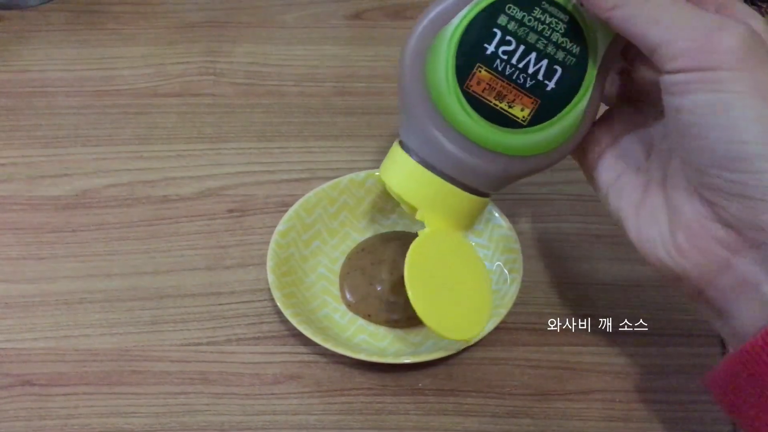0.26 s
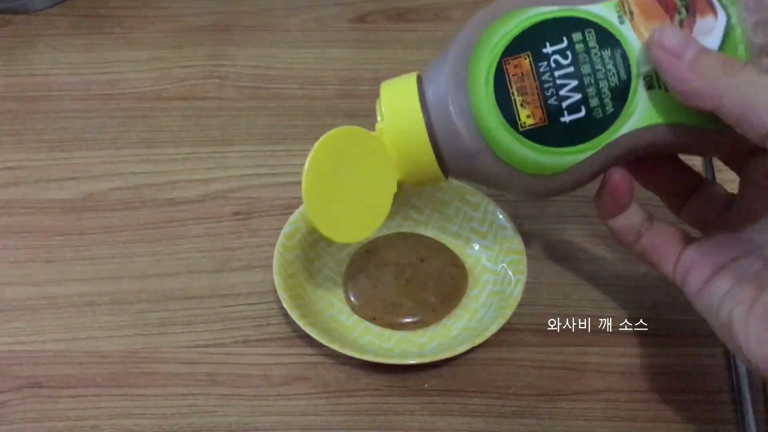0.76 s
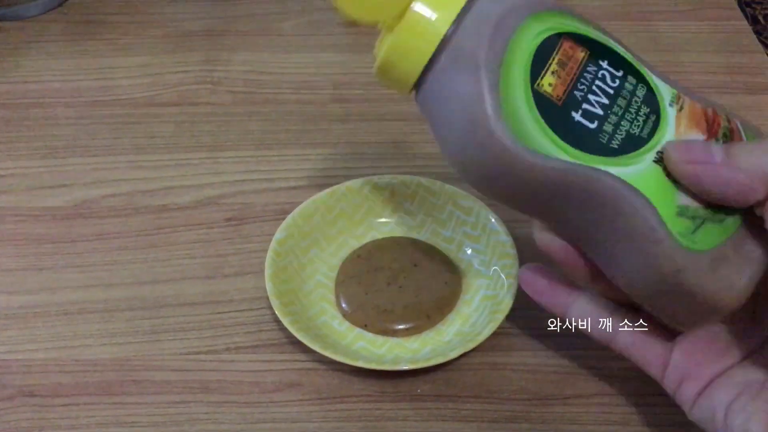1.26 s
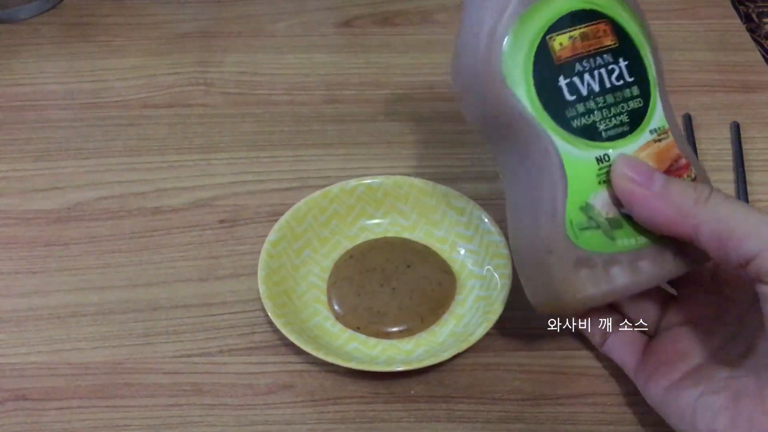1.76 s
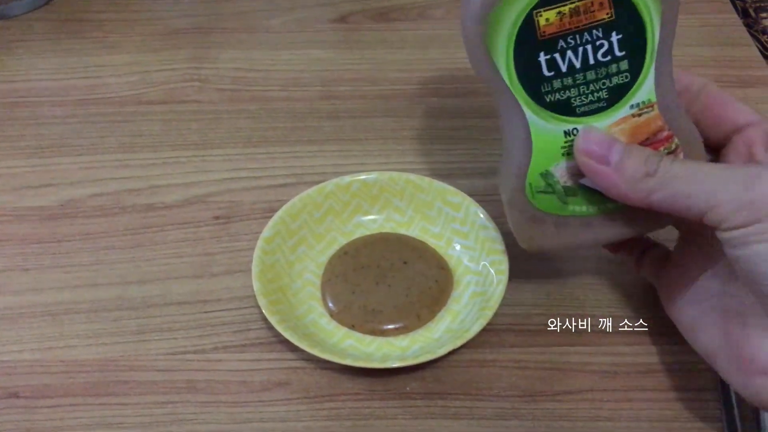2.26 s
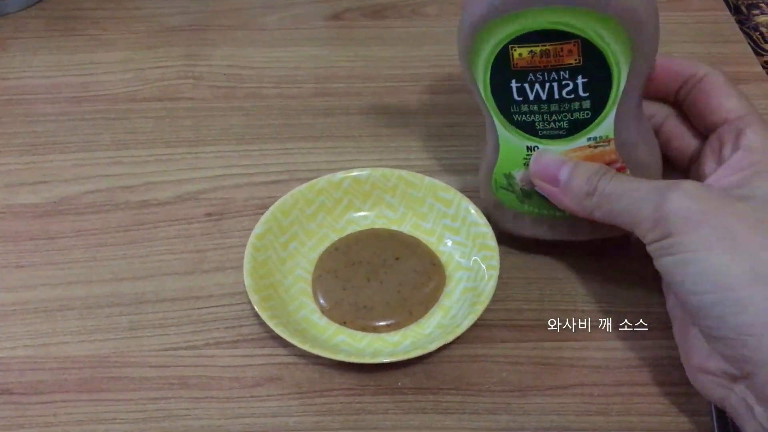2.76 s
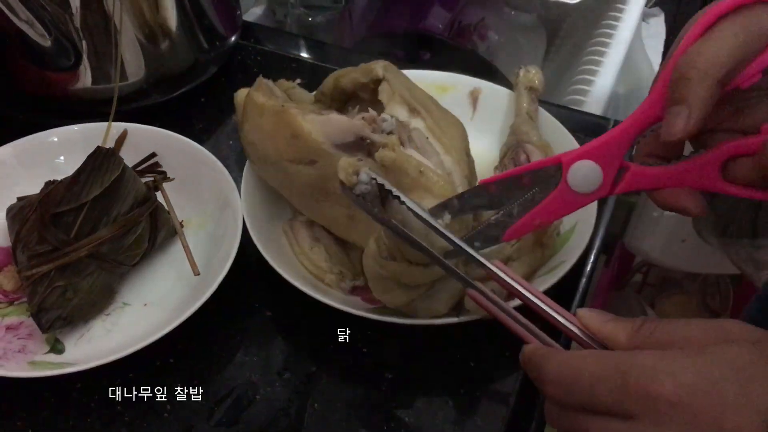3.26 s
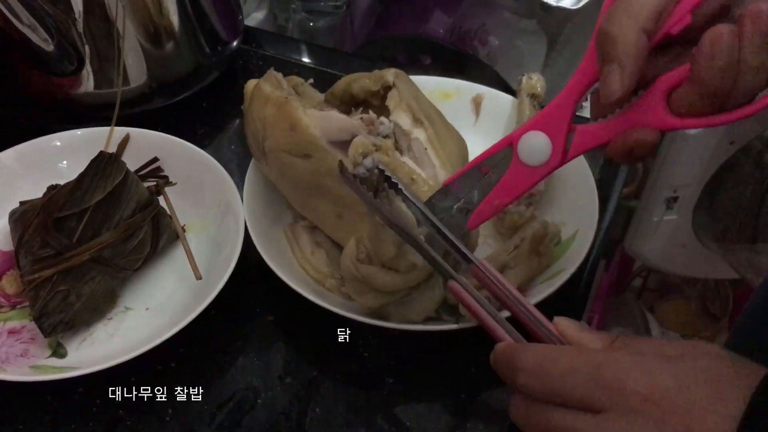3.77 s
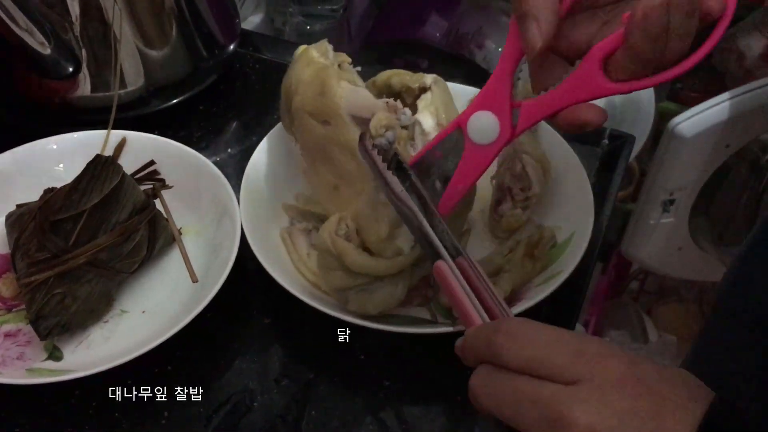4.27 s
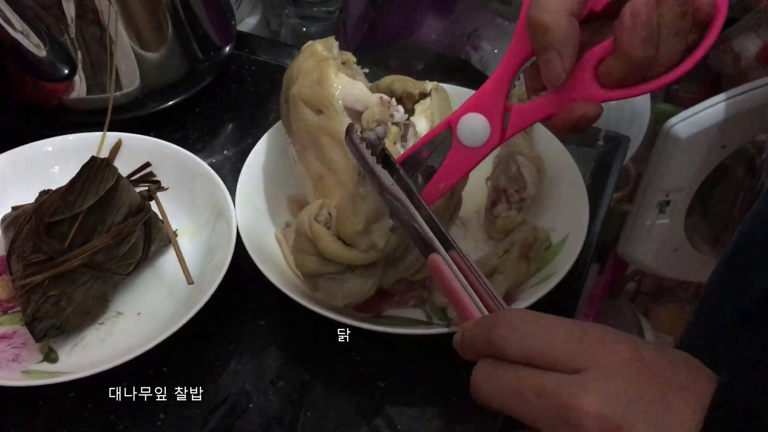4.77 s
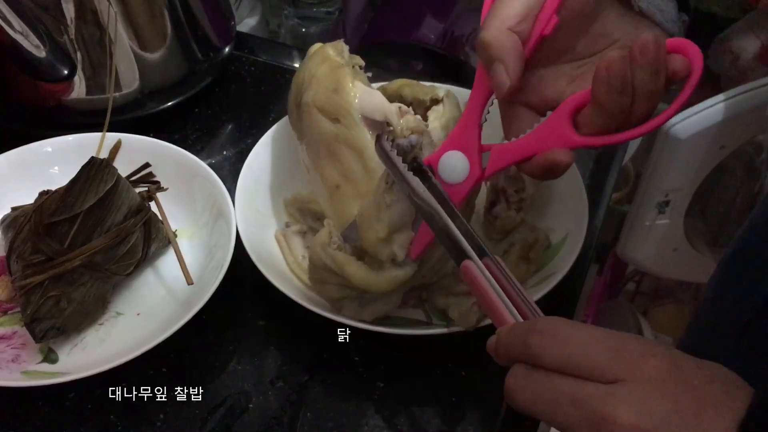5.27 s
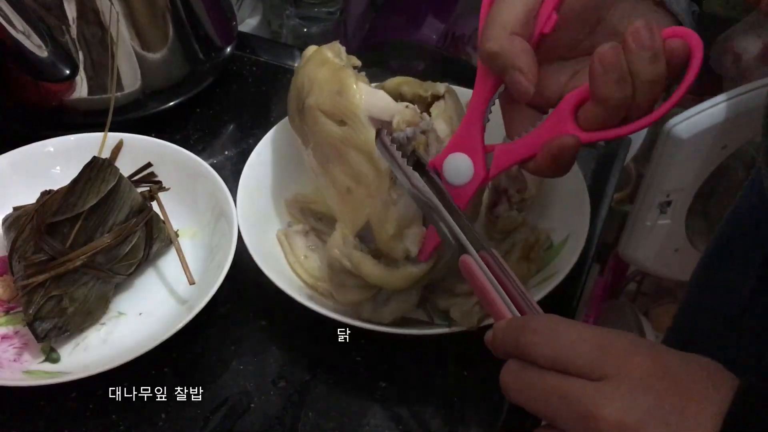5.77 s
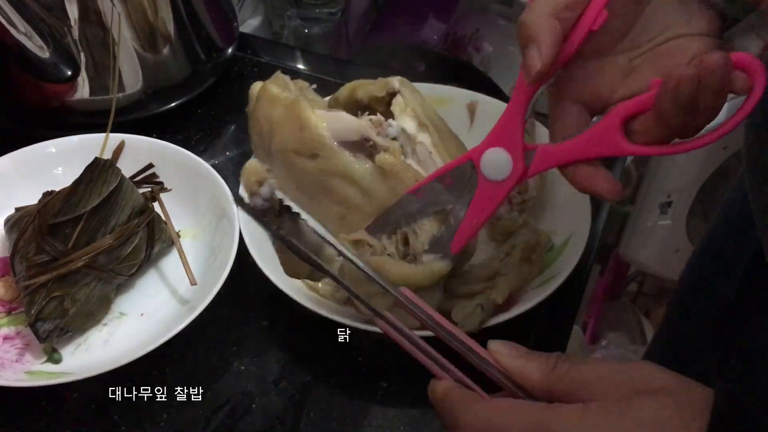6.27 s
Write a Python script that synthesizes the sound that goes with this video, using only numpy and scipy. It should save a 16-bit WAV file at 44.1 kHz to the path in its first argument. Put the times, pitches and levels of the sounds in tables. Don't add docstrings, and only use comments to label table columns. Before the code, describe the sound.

Quiet kitchen air with faint bottle handling and a soft table knock, then louder fan drone, wet snips, tong rings and a sharp bone crunch.

```python
import sys
import numpy as np
from scipy import signal
from scipy.fft import rfft, irfft
from scipy.io import wavfile
from scipy.ndimage import uniform_filter1d

SR = 44100
rng = np.random.default_rng(int(sys.argv[2]) if len(sys.argv) > 2 else 0)


def to_linear_factor(level_db):
    exponent = np.asarray(level_db, float) / 20
    return 10 ** exponent


def log_audio(samples):
    frames = np.atleast_2d(samples).T
    limited = np.clip(frames, -1, 1)
    pcm = np.round(limited * 32767).astype(np.int16)
    wavfile.write(sys.argv[1], SR, pcm)


N = 287825
T = np.arange(N) / SR
CUT_S = 2.863


def evened(x):
    return x / np.sqrt(np.mean(x ** 2) + 1e-20)


def read(points, hz):
    f, value = np.transpose(points)
    return np.interp(np.log(hz + 1), np.log(f + 1), value)


def curve(rows, column=1):
    return np.interp(T, np.array(rows)[:, 0], np.array(rows)[:, column])


def add(mix, s, sound):
    part = mix[round(s * SR):][:len(sound)]
    part += sound[:len(part)]


def band(x, hz, width, skirt_db=-200):
    off = (np.fft.rfftfreq(len(x), 1 / SR) - hz) / (0.79 * width)
    gain = np.exp(-off ** 2) + to_linear_factor(skirt_db) / (1 + (off / 2) ** 2)
    return irfft(rfft(x) * gain, len(x))


def noise_band(hz, width):
    return evened(band(rng.standard_normal(N), hz, width))


def noise_bands(rows):
    return sum(to_linear_factor(db) * noise_band(hz, width) for hz, width, db in rows)


def air(spectrum, patchy_db):
    frames, hz = N // 512 + 5, np.fft.rfftfreq(2048, 1 / SR)
    a, b, patches = rng.standard_normal((frames, 1025, 3)).T
    patches = uniform_filter1d(patches, size=20, axis=0)
    patches = evened(uniform_filter1d(patches, size=8, axis=1))
    z = (a + 1j * b) * to_linear_factor(read(spectrum, hz)[:, None] + patchy_db * patches)
    return evened(signal.istft(z, nperseg=2048, noverlap=1536)[1][:N])


def wavering(rows, wobble_hz):
    wander = evened(uniform_filter1d(rng.standard_normal(N), size=1500))
    turns = np.cumsum(curve(rows) + wobble_hz * wander) / SR
    return np.sqrt(2) * to_linear_factor(curve(rows, column=2)) * np.sin(2 * np.pi * turns)


def drone(draught, resonances):
    flutter_db, flutter_s = 2.4, 0.06
    out = np.zeros(N)
    for hz, over_db, wander_hz, side in resonances:
        rows = [(s, hz, db + over_db + side * lean_db) for s, db, lean_db in draught]
        flutter = noise_band(0, 1 / flutter_s)
        out += wavering(rows, wander_hz) * to_linear_factor(flutter_db * flutter)
    return out


def struck(force, modes):
    t = T[:SR // 3]
    ring = sum(to_linear_factor(db - 60 * t / t60) * np.sin(2 * np.pi * hz * t) for hz, db, t60 in modes)
    return signal.oaconvolve(force, ring)[:N]


def tapped(taps, modes, spread_db, contact_s=.0001):
    out = np.zeros(N)
    chance = rng.standard_normal((len(taps), len(modes), 2))
    push = np.exp(-((T[:128] - 4 * contact_s) / contact_s) ** 2)
    push = push / push.sum()
    for (s, tap_db), shifts in zip(taps, chance):
        for (hz, db, t60), shift, side in zip(modes, shifts[:, 0], chance[0, :, 1]):
            ring = struck(push, [(hz, db + tap_db + spread_db * shift, t60)])
            add(out, s - 4 * contact_s, np.sign(side) * ring)
    return out


def rubs(slides):
    out = np.zeros(N)
    for s, length, db, hz, width in slides:
        grain = rng.standard_normal(12000) * to_linear_factor(1.5 * rng.exponential(1, 12000))
        swell = np.exp(-((T[:12000] - 6000 / SR) / (0.58 * length)) ** 2)
        add(out, max(s - 6000 / SR, 0), to_linear_factor(db) * swell * evened(band(grain, hz, width)))
    return out


def thinned(x):
    return signal.sosfilt(signal.butter(2, 1100, "high", fs=SR, output="sos"), x)


def table_air():
    # pitch_hz, level_db (per Hz)
    colour = [(20, -25), (32, -28), (47, -2), (64, -6), (144, -8), (166, -16), (191, -12.5), (259, -15.5),
              (350, -14), (416, -25.5), (1100, -29), (2300, -37.5), (3300, -46), (15500, -61)]
    # start_s, level_db
    gusts = [
        [(0.0, -52), (0.296, -63), (0.39, -41.5), (0.64, -57), (0.68, -41.5), (0.904, -57), (0.992, -43),
         (1.284, -60), (1.3, -52)],
        [(1.36, -73), (1.418, -47), (1.732, -45.5), (1.936, -71), (1.994, -52), (2.198, -44), (2.238, -59),
         (2.84, -50), (2.85, -58)],
    ]
    # pitch_hz, level over draught_db, wander_hz, side of lean
    resonance = [(62.9, -0.84, 2.93, 0)]
    draught = [(s, db, 0) for s, db in sum(gusts, [])]
    return to_linear_factor(-47.5) * air(colour, patchy_db=0.5) + drone(draught, resonance)


def hums():
    # pitch_hz, width_hz, level_db
    hum_bands = [(140, 16, -60), (236, 14, -64), (345, 14, -64)]
    return (T < CUT_S) * noise_bands(hum_bands)


def rubs_and_hisses():
    # middle_s, length_s, level_db,
    # pitch_hz, width_hz
    rub_rows = [(.195, .05, -71, 11000, 9000), (.72, .2, -82, 11500, 4000),
                (1.005, 0.057, -70, 8500, 11000), (1.291, 0.038, -66, 11500, 9000),
                (1.432, 0.05, -67, 7000, 9000), (1.416, 0.03, -63, 2800, 3000),
                (1.565, .035, -69.5, 9500, 8000), (1.65, 0.073, -71, 9000, 6000),
                (1.704, .04, -62.5, 11300, 6000), (1.949, 0.028, -72, 5000, 5000),
                (2.65, 0.046, -75, 9000, 8000), (4.021, 0.027, -58, 9500, 9000),
                (5.81, 0.027, -67, 11040, 8930), (4.2098, .003, -45, 8800, 2500),
                (4.217, 0.008, -44, 7800, 4000), (4.232, .02, -54, 9500, 10000),
                (5.855, .015, -57, 9500, 10000), (5.953, .006, -41, 8000, 8000),
                (5.982, 0.008, -36, 10000, 10000),
                (.75, .15, -74, 2900, 1100), (.66, .05, -82, 11500, 6000), (.81, .04, -81, 9000, 9000),
              (1.01, .05, -74, 4000, 2500), (1.295, .035, -70, 4000, 3000), (1.425, .02, -62, 900, 500),
              (1.7, .06, -75, 4300, 3000), (2.2, .06, -84, 12500, 3000), (4.217, .01, -44, 1000, 300),
              (4.216, .004, -50, 2200, 600), (4.224, .006, -47, 13500, 5000), (6.0, .025, -50, 3200, 1500),
              (6.0, .03, -51, 750, 300)]
    return rubs(rub_rows)


def tick_rows():
    # start_s, peak_db, pitch_hz
    bottle_ticks = [(.1506, -64, 2650), (.1734, -59, 3920), (.43, -54, 3260), (1.017, -58, 8790),
                    (1.0656, -52.5, 5150), (1.2945, -63, 10770), (1.4139, -60, 3990), (1.5122, -53, 6140),
                    (1.6893, -60, 10360), (1.7078, -58, 12760), (2.1131, -50, 6040), (2.1476, -52.5, 6620)]
    # start_s, peak_db, pitch_hz
    grip_ticks = [(2.8755, -51, 4350), (2.9047, -56, 7970), (2.9805, -58, 10280), (3.0146, -57, 10660),
                  (3.0331, -62, 12500), (3.0614, -56, 13630), (3.1314, -58, 13000), (3.1405, -55, 9360),
                  (3.2464, -52, 5930), (3.539, -48, 10500), (3.6346, -52, 7720), (3.6423, -43, 9300),
                  (3.758, -51, 11500), (3.819, -45.5, 8630), (3.8338, -49, 8600), (3.8817, -49, 8150),
                  (3.9015, -51, 12090), (3.9388, -55, 11500), (3.9499, -45, 11000), (3.9659, -55, 10950),
                  (4.0033, -43, 9890), (4.0152, -51, 8550), (4.0236, -42, 9000), (4.1254, -56, 13000)]
    # start_s, peak_db, pitch_hz
    cut_ticks = [(4.2075, -49, 9000), (4.2122, -21, 12200), (4.2202, -37, 12770), (4.2467, -49, 12330),
                 (5.041, -45, 12050), (5.0475, -38, 8950), (5.0692, -44, 7720), (5.0805, -57, 12500),
                 (5.0987, -62, 13200), (5.116, -53, 10790), (5.2143, -49, 10190), (5.3039, -49, 8410),
                 (5.408, -63, 13400), (5.4588, -41.5, 11500), (5.4953, -61, 10570), (5.6275, -52, 7500),
                 (5.801, -39, 8830), (5.819, -54, 8500), (5.8342, -60, 11000), (5.8443, -28, 6300),
                 (5.952, -26, 7500), (5.9641, -14, 7200), (5.981, -29, 8800), (6.153, -50, 8000),
                 (6.2045, -48, 15000), (6.294, -41, 10880), (6.3866, -58, 14780), (6.425, -51, 10040)]
    # start_s, peak_db, pitch_hz, width_hz
    snaps = [(4.2126, -27, 7900, 2400), (4.2122, -23, 16000, 3000), (4.2125, -37, 2300, 1200),
             (5.8441, -30.5, 6600, 1100), (5.8445, -43, 14500, 3500), (5.8025, -43, 1700, 1800),
             (5.8366, -51, 9000, 2000), (1.4228, -51, 1850, 250), (1.4265, -55, 1800, 250),
             (1.425, -58, 2300, 300), (1.4225, -57, 3570, 400), (1.417, -57, 2500, 520),
             (.4296, -52, 2500, 1200), (1.0656, -54, 1900, 2700), (2.1137, -55, 3500, 2700),
             (5.9608, -19, 6500, 2400), (5.9628, -16, 3500, 2100), (5.966, -16.5, 6050, 3500),
             (5.970, -21, 5500, 3400), (3.4975, -44.5, 7600, 3600), (4.1818, -46, 8600, 3000),
             (6.1861, -50, 6100, 1500), (6.24, -43.5, 7200, 1700), (5.9638, -27, 18000, 4000),
             (5.8445, -52, 2400, 2500), (5.054, -41, 6200, 1800),
             (3.5405, -57, 5900, 900), (3.541, -56, 14500, 2000), (3.58, -63, 14000, 3000),
            (3.769, -61, 8500, 2500), (3.8815, -57, 4000, 700), (4.0165, -56, 4700, 900),
            (4.0235, -52, 6200, 700), (4.024, -55, 4600, 700), (4.034, -54, 9500, 4000),
            (5.106, -60, 13000, 3000), (5.128, -61, 12600, 1000), (5.379, -62, 14000, 3000),
            (5.8075, -53, 6500, 2500), (5.8462, -43, 9000, 1500), (5.8466, -43, 12700, 2500),
            (5.9639, -16, 3400, 1200), (5.9465, -52, 9000, 6000), (5.9495, -48, 9000, 5000),
            (5.9545, -35, 9000, 3500), (5.9579, -33, 6500, 3500), (5.9594, -32, 8000, 4000),
            (5.9616, -19, 5600, 2000), (5.9716, -25, 2700, 1000), (5.9757, -29, 3300, 1200),
            (5.984, -31, 7000, 4000), (6.101, -60, 14000, 3500), (6.161, -54, 8600, 1800),
            (6.169, -58, 5600, 600), (6.266, -61, 8500, 1200), (6.435, -61, 7100, 900)]
    seeps_per_s, seep_db, seep_spread_db = 4, -66, 3
    when, size, pitch = rng.random((60, 3)).T
    at = CUT_S + np.cumsum(-np.log(when)) / seeps_per_s
    seeps = zip(at, seep_db - seep_spread_db * np.log(size), 9500 + 4500 * pitch)
    seeps = [row for row in seeps if row[0] < T[-1]]
    sized = []
    for s, db, hz in bottle_ticks + grip_ticks + cut_ticks + seeps:
        width = min(1.2 * hz, 6000, 2 * (16500 - hz))
        sized.append((s, db, hz, width))
    return snaps + sized


def ticks():
    out, t = np.zeros(N), T[:512]
    chance = rng.standard_normal((170, 512))
    chance[:, 0] = 7
    for (s, db, hz, width), noise in zip(tick_rows(), chance):
        burst = band(np.roll(noise * np.exp(-t / 0.00092), 64), hz, width, skirt_db=-20)
        add(out, s - 70 / SR, to_linear_factor(db + 7) * burst / abs(burst).max())
    return out


def rustle():
    # middle_s, length_s, level_db
    brushes = [
        (.8, .5, -77),
        (1.56, .2, -80),
        (3.5, 0.89, -76),
        (4.418, 0.27, -64.5),
        (6.1, 0.16, -65),
        (6.35, .2, -69.5),
    ]
    swell = sum(to_linear_factor(db) * np.exp(-((T - s) / length) ** 2) for s, length, db in brushes)
    return swell * noise_band(6400, 13500)


def dish():
    # start_s, level_db
    jolts = [
        (2.5742, -55.5),
    ]
    # pitch_hz, level_db, t60_s (time to fade by 60 dB)
    modes = [(2255, 3, 0.4), (4000, 5, .006), (4619, -8, .13), (7386, -7, .08)]
    return tapped(jolts, modes, .8, contact_s=.00002)


def bottle_knocks():
    # start_s, level_db
    knocks = [
        (2.5755, -39),
        (2.5793, -39),
        (2.5843, -42),
        (2.587, -37.5),
        (2.591, -44),
    ]
    # pitch_hz, level_db, t60_s
    modes = [(260, 4, 0.09), (356, 0.5, .05), (450, -5, 0.035), (590, -4, 0.035), (712, -9, .03),
             (925, 0, .05), (978, 4.5, 0.046), (1310, -5, .012), (1670, -0.5, .03), (1950, -24, .02),
             (2650, -3, 0.009), (3110, -2, 0.0089)]
    # pitch_hz, level_db, t60_s
    deep_modes = [(205, 7, .06), (355, -6, .2)]
    return tapped(knocks, modes + deep_modes, 2.2, contact_s=0.00011)


def counter_air():
    # pitch_hz, level_db (per Hz)
    colour = [(76, -34.5), (130, -2), (150, -14), (210, -18.5), (267, -14.5), (301, -19), (340, -16.5),
              (527, -23), (670, -20), (819, -24), (1040, -24.5), (2600, -33.5), (4960, -46), (8850, -52),
              (15500, -60.5)]
    # start_s, level_db, lean_db (upper resonance against the whole)
    draught = [(2.87, -35, 2), (3.13, -41.5, -5), (3.21, -54, 4), (3.24, -37, -3), (3.36, -35, 1),
               (3.4, -40.5, -4), (3.93, -32, -1.5), (3.97, -49, 2.5), (4.08, -36.5, -5), (4.74, -31, -2.5),
               (4.93, -39.5, -5), (5.17, -33.5, 1.5), (5.53, -48.5, -5), (5.71, -31.5, -4),
               (6.11, -44, -0.5), (6.2, -36.5, 1), (6.32, -41.5, -1.5), (6.53, -35, 0)]
    # pitch_hz, level over draught_db, wander_hz, side of lean
    resonances = [(104.2, -9, 3.17, -1.61), (118.2, -0.56, 2.63, 0.94)]
    # pitch_hz, width_hz, level_db
    whistles = [(271.4, 17, -58), (332, 21, -56), (662.4, 21, -60), (1068, 20, -65.5)]
    draught_db = curve(draught) - np.mean(draught, axis=0)[1]
    rumble = to_linear_factor(-45 + 0.3 * draught_db) * noise_band(54.7, 36)
    hiss = to_linear_factor(-42.5) * air(colour, patchy_db=0.87)
    return hiss + drone(draught, resonances) + rumble + noise_bands(whistles)


def background():
    after = np.clip((T - CUT_S) / .003, 0, 1)
    return (1 - after) * table_air() + after * counter_air()


def squeak():
    # start_s, pitch_hz, level_db
    whistle = [
        (3.405, 13000, -84),
        (3.419, 13700, -78),
        (3.47, 13550, -79),
        (3.485, 14000, -86),
        (3.52, 14940, -85),
    ]
    return wavering(whistle, wobble_hz=30) * (T > whistle[0][0]) * (T < whistle[-1][0])


def tongs():
    # start_s, level_db, favoured pitch_hz
    touches = [
        (3.537, -66, 5700),
        (3.901, -63, 5700),
        (3.9387, -62, 7500),
        (3.949, -58.5, 5700),
        (4.075, -69, 10000),
        (4.115, -63, 3800),
        (4.655, -63, 9000),
        (4.682, -58, 9000),
    ]
    # pitch_hz, level_db, t60_s
    modes = [(3536, 5.5, 0.094), (4613, 2, 0.064), (5720, 5.5, 0.05), (9950, -5, .16), (12050, -7, .04),
             (13450, -4, .06)]
    place_db_per_octave = 7
    out = np.zeros(N)
    for s, tap_db, place_hz in touches:
        favoured = [(hz, db - place_db_per_octave * abs(np.log2(hz / place_hz)), t60)
                    for hz, db, t60 in modes]
        out += tapped([(s, tap_db)], favoured, 1.5, contact_s=.00001)
    return out


def plate_taps():
    # start_s, level_db
    touches = [
        (5.2815, -62),
        (5.3025, -56.5),
    ]
    # pitch_hz, level_db, t60_s
    modes = [(4021, 4, 0.049), (6030, 6, .025), (7390, -8, 0.0399), (9500, -6, .02), (11200, 3, .025),
             (13560, -12, .04), (15560, -5, 0.08)]
    return tapped(touches, modes, 1.5, contact_s=.00001)


def crunch():
    # start_s, level_db
    crackle = [
        (5.944, -77),
        (5.951, -51),
        (5.956, -62),
        (5.9605, -34),
        (5.966, -29.5),
        (5.972, -41),
        (5.983, -39.5),
        (5.99, -50),
        (6.025, -63),
    ]
    # pitch_hz, level_db, t60_s
    modes = [(2050, -28, 0.0082), (2390, -16, .01), (2750, -3, 0.014), (3140, 1, 0.013), (3530, -4, 0.0078),
             (3760, -3, 0.02), (4670, -3, 0.0099), (5460, -8, .014), (5900, 0, 0.0077), (6560, -2, 0.0062),
             (7500, -9, .005), (8300, -5, .005), (9360, -6, .006), (11600, -5, .004)]
    cracks = rng.standard_normal(N) * (rng.random(N) < 5000 / SR)
    during = (T > crackle[0][0]) * (T < crackle[-1][0])
    force = evened(cracks) * to_linear_factor(curve(crackle)) * during
    return to_linear_factor(-14.5) * struck(force, modes) + to_linear_factor(-8) * band(force, 5000, 6000, skirt_db=-20)


def splinters():
    # middle_s, length_s, level_db, pitch_hz, width_hz
    bursts = [
        (5.9585, .002, -37, 9500, 5000),
        (5.962, .004, -32, 13500, 7000),
        (5.967, .004, -39, 15500, 3000),
        (5.964, .012, -39, 200, 90),
        (5.995, .02, -41, 200, 90),
        (5.972, .008, -33, 5700, 900),
    ]
    return rubs(bursts)


def plate_thuds():
    # start_s, level_db
    thuds = [
        (5.9655, -36),
        (5.9695, -40.5),
    ]
    # pitch_hz, level_db, t60_s
    modes = [(522, 4, .07), (899, -2, .05), (1040, 0, .08), (1300, -3, 0.08), (1470, -10, .04),
             (1630, -20, .03)]
    return tapped(thuds, modes, 1.3, contact_s=.00008)


def room(x):
    # pitch_hz, t60_s
    fading = [(300, 0.36), (2000, 0.22), (6000, 0.17), (15000, 0.14)]
    taps = np.zeros(SR // 2)
    at = np.arange(80, SR // 2 - 12, 12)
    taps[at + rng.integers(0, 12, len(at))] = rng.choice([-1., 1.], len(at))
    hz, t, z = signal.stft(taps, SR, nperseg=128)
    fall_db = -60 * t / read(fading, hz)[:, None]
    nearby = 1.8 * np.exp(-t / 0.0065)
    tail = signal.istft(z * to_linear_factor(fall_db) * (1 + nearby), SR, nperseg=128)[1]
    return signal.fftconvolve(x, tail / np.linalg.norm(tail))[:N]


def scene():
    near = thinned(ticks()) + tongs() + plate_taps()
    heavy = bottle_knocks() + thinned(crunch()) + plate_thuds()
    echoes = to_linear_factor(-9.0) * room(near) + to_linear_factor(-6.0) * room(heavy)
    friction = rubs_and_hisses() + rustle() + squeak() + splinters()
    return (background() + hums() + near + heavy + echoes + friction + dish())[None]


def low_pass(x):
    return signal.sosfilt(signal.butter(12, 16650, fs=SR, output="sos"), x)


def record(dry):
    # pitch_hz, level_db
    ripples = [(2000, 0), (2600, -2), (3200, -0.5), (4200, 0), (4800, -1.5), (5600, 2.5), (7000, 2),
               (7700, -1), (9300, 1.5), (10500, -4.5), (11800, 0.5), (15700, -1.5)]
    edge_hz, edge_db = 15760, -40
    hz = np.fft.rfftfreq(1024, 1 / SR)
    colour_db = read(ripples, hz) + edge_db * np.clip((hz - edge_hz) / 170, 0, 1)
    taps = signal.firwin2(1023, hz, to_linear_factor(colour_db), window=("kaiser", 5), fs=SR)
    padded = np.pad(dry, ((0, 0), (511, 511)), "reflect", reflect_type="odd")
    return low_pass(signal.oaconvolve(padded, taps[None], "valid"))


dry = scene()
out = record(dry)
log_audio(out)
```